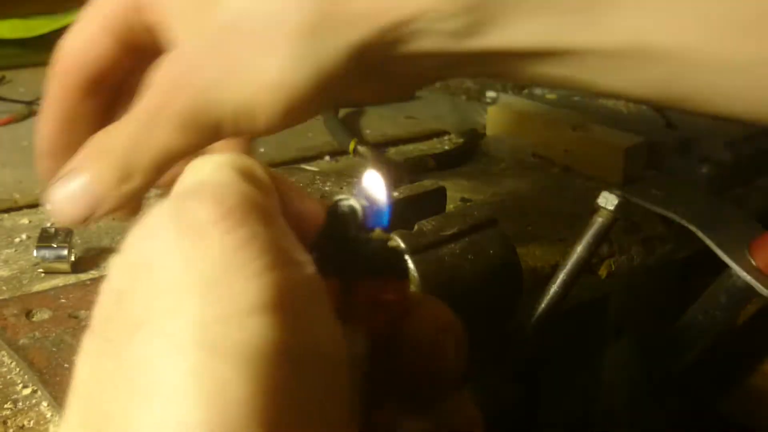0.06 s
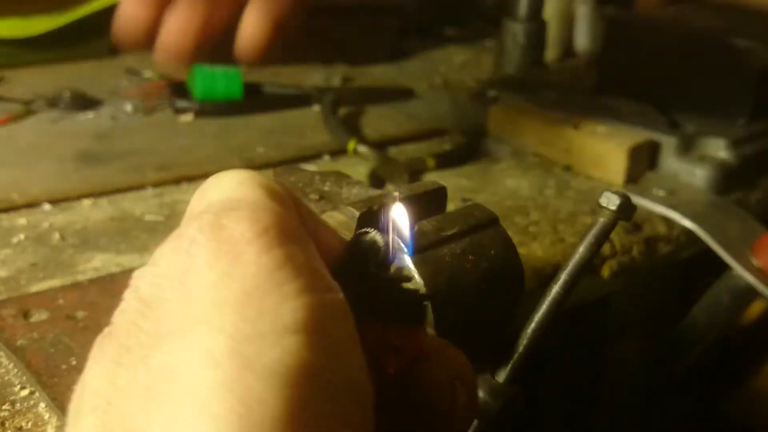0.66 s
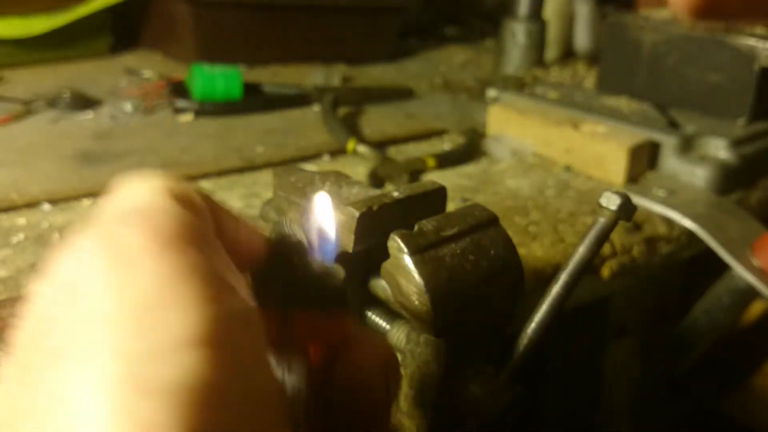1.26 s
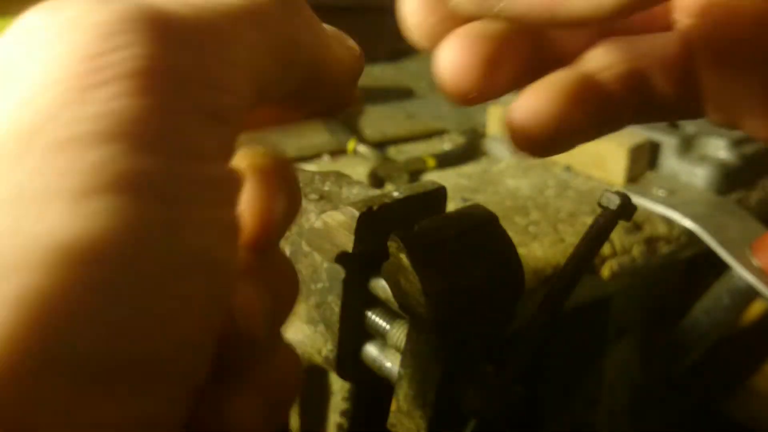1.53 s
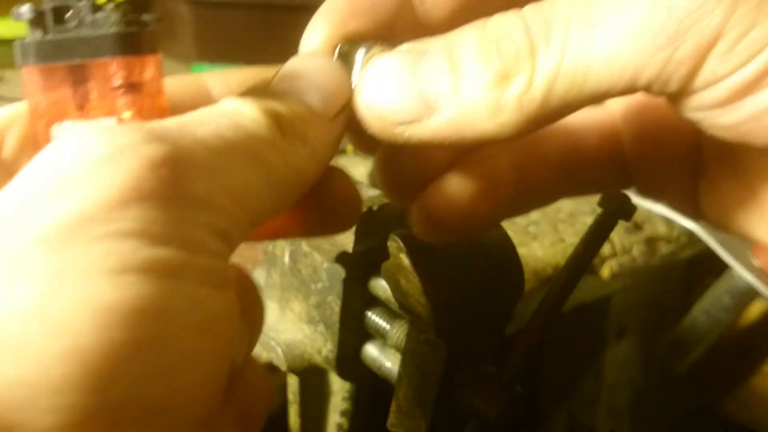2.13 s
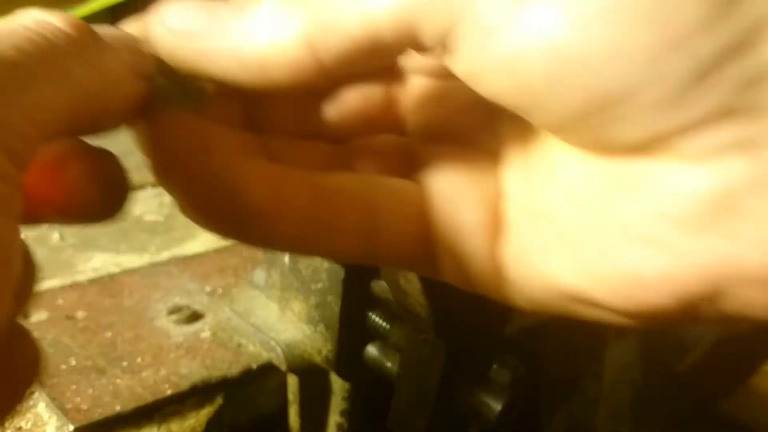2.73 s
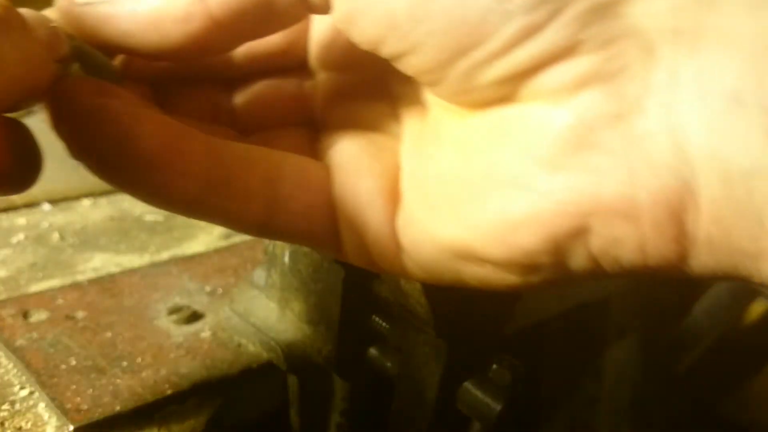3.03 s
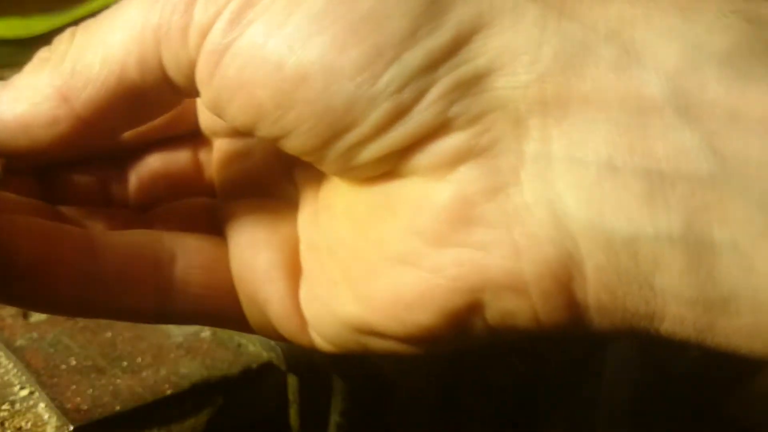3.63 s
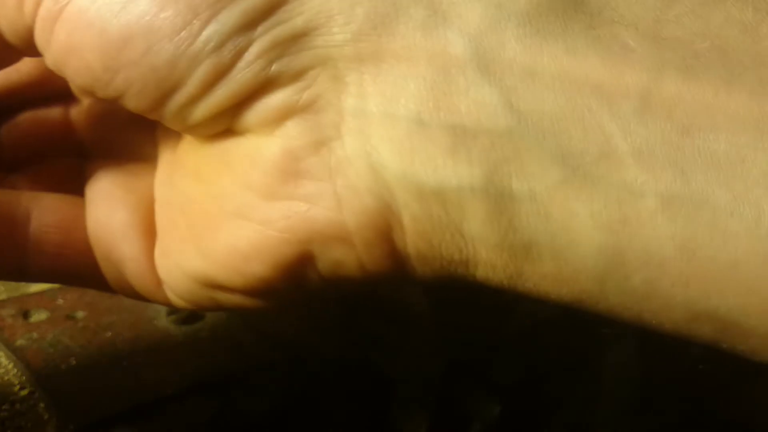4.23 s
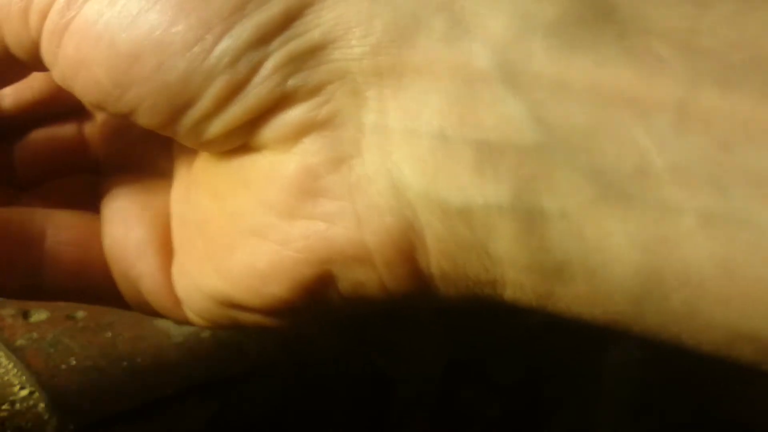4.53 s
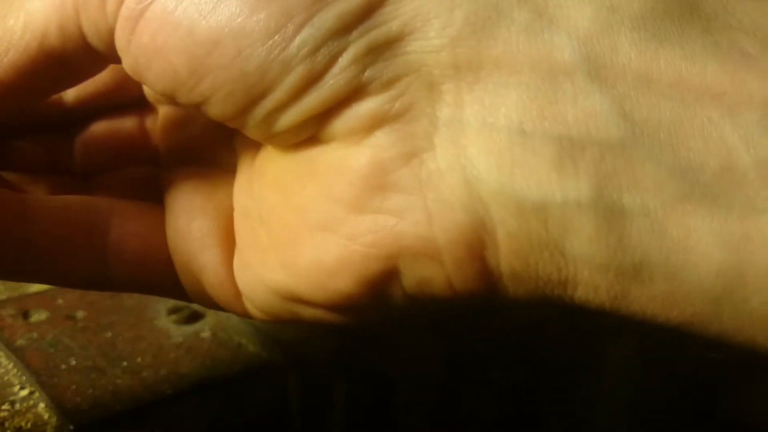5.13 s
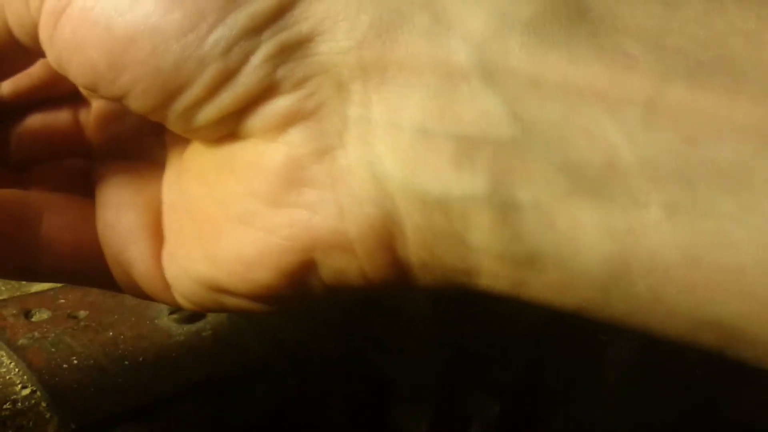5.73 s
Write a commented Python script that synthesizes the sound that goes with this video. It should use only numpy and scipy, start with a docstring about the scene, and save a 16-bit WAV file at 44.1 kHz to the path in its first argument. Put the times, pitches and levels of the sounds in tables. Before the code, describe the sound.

A disposable lighter is handled close to the microphone in a small, dry workshop, over faint steady hiss and a low mains hum on the right. A few light finger ticks lead to one short, bright, gritty rasp of the flint wheel at about 0.6 seconds. Between 1.1 and 1.8 seconds there is a barely audible whistle and hiss of gas, with scattered small ticks of fingers on the lighter. At about 2.6 seconds a thumb pushes the steel hood down in a quick cluster of soft, muffled thuds. At 2.8 seconds the hood snaps home, the loudest sound: a sharp, briefly ringing metal click with a dull plastic knock and a slight low thump. After that only the background remains, until a camera's focus motor ticks faintly in three short runs from about 5.4 to 5.8 seconds.

```python
"""A lighter on a workbench

A disposable lighter is handled close to the microphone in a small, dry workshop. The flint wheel
rasps once, the gas sings faintly, fingers tick on the case, then the steel hood is pressed on and
snaps home. Underneath are hiss, mains hum on the right and a camera's faintly stepping focus."""
import sys
import numpy as np
from scipy import signal
from scipy.fft import rfft, irfft
from scipy.io import wavfile

SR = 44100
rng = np.random.default_rng(int(sys.argv[2]) if len(sys.argv) > 2 else 0)


def generate_wav(sig):
    """Save sig (samples, or channels by samples) to the path in sys.argv[1] as 16-bit PCM at SR."""
    pcm = np.round(np.clip(np.atleast_2d(sig).T, -1, 1) * 32767).astype(np.int16)
    wavfile.write(sys.argv[1], SR, pcm)


N = 259308
TAPS = 2 ** 14  # samples allowed for a ring or an echo to die away
TIME, FREQS = np.arange(N) / SR, np.maximum(np.fft.rfftfreq(TAPS, 1 / SR), 1)


# The wheel creeps, turns under growing pressure, then spins free: start_s, level_db, slope_db_per_s
WHEEL_SLIDES = [(0.548, -51, -0.5), (0.5558, -40, 279.5), (.582, -21.5, -1050)]
# Tone of the scraped flint: pitch_hz, gain_db
FLINT_TONE = [(100, -22), (250, -16.5), (700, -15), (1200, -13.5), (1700, -14), (3000, -6), (5500, 0.5),
              (7500, -2), (10000, -2.5), (12500, -14), (15500, -17)]
# Where the wheel and its bracket ring: pitch_hz, width_hz, boost_db
WHEEL_RINGS = [(1630, 200, 6.5), (2700, 460, 5.5), (3660, 190, 8.5), (5060, 110, 2.5), (5620, 190, 9),
               (5900, 110, 3.5), (7410, 130, 7.5), (9240, 150, 1.5)]

def flint_wheel(teeth_hz=440, bite=.4):
    """The wheel's teeth tear grains off the flint; each slide swells or fades until the next begins."""
    force = np.zeros(N)
    for start_s, level_db, slope in WHEEL_SLIDES:
        start = round(start_s * SR)
        force[start:] = amp(np.clip(level_db + slope * TIME[:N - start], -200, 0))
    teeth = 1 + bite * np.sin(2 * np.pi * teeth_hz * TIME)
    return body(force * teeth * grit(grains_per_s=11000), FLINT_TONE, WHEEL_RINGS)


# The hood passes its catches and snaps home: start_s, level_db, decay_s
HOOD_SNAPS = [(2.7911, -62.5, 0.0075), (2.8182, -21.5, .0012), (2.8205, -13.5, .003)]
# Tone of the steel hood: pitch_hz, gain_db
HOOD_TONE = [(200, -17.5), (900, -14.5), (1400, -20), (2000, -8.5), (3500, -9), (5500, -0.5), (7500, -2),
             (10000, -4.5), (12500, -20.5), (15500, -23.5)]
# Where the hood rings: pitch_hz, width_hz, boost_db
HOOD_RINGS = [(2740, 80, 9.5), (3800, 82, 9), (3962, 110, 10), (4670, 70, -1), (5220, 110, 8),
              (5300, 80, 4.5), (6200, 99.4, 6.5), (6180, 100, 3), (6300, 60, 3), (8090, 110, -1.5),
              (9440, 70, 5), (9610, 70, 1)]

def steel_hood(rattle_db=-17.5, rattle_decay_s=.01976):
    """The hood rings brightly at each catch, then rattles on more quietly."""
    rattles = [(start_s, level_db + rattle_db, rattle_decay_s) for start_s, level_db, _ in HOOD_SNAPS]
    return body(contacts(HOOD_SNAPS, blow_share=.06) + contacts(rattles), HOOD_TONE, HOOD_RINGS)


# The thumb pushes the hood down in jerks: start_s, level_db, decay_s
THUMB_PUSHES = [(2.6285, -46.5, .003), (2.632, -39.5, .004), (2.641, -44, .009), (2.662, -49, .006),
                (2.712, -66.5, .014)]
# Tone of hood and case under the thumb: pitch_hz, gain_db
MUFFLED_TONE = [(50, -27.5), (130, -11), (330, -1.5), (550, -1), (750, -7.5), (1050, -5.5), (1600, -10.5),
                (2800, -9), (3900, -14), (5000, -31), (15500, -55)]
# Where they still ring: pitch_hz, width_hz, boost_db
MUFFLED_RINGS = [(449.7, 110, 12), (2680, 180, 7.7)]

def thumb_pushes():
    """The thumb muffles the hood as it presses, so each push is a thud."""
    return body(contacts(THUMB_PUSHES, blow_share=.5), MUFFLED_TONE, MUFFLED_RINGS)


# The boom after the snap: start_s, level_db, decay_s
LOW_BOOM = [(2.836, -40, .02)]
# Tone of the boom: pitch_hz, gain_db
BOOM_TONE = [(30, -14.5), (60, -12), (100, -19.5), (150, -3), (220, -0.5), (340, -9.5), (600, -19.5),
             (1500, -45), (15500, -70)]

def low_boom():
    """A low, soft boom lingers just after the snap."""
    return body(contacts(LOW_BOOM), BOOM_TONE)


# Knocks of the case: start_s, level_db, decay_s
CASE_KNOCKS = [(.406, -64, 0.012), (.586, -55, .008), (2.788, -60.5, 0.014), (2.8228, -21.5, .005)]
# Tone of the plastic: pitch_hz, gain_db
CASE_TONE = [(20, -44), (60, -27), (120, -14.5), (250, -7.5), (500, -0.5), (750, -5.5), (1100, -5.5),
             (1600, -10), (2700, -5.5), (3800, -12), (5000, -27), (9000, -44), (15500, -53)]
# Where the case and cupped hand ring: pitch_hz, width_hz, boost_db
CASE_RINGS = [(139, 9.3, 9), (200.7, 13, 11), (253, 28, 10.5), (340, 25, 5.5), (457, 43, 11.5),
              (534.6, 35, 5.5), (661, 23, 13), (900, 80, 6)]

def plastic_case():
    """The plastic case knocks dully in the cupped hand."""
    return body(contacts(CASE_KNOCKS, blow_share=.6), CASE_TONE, CASE_RINGS)


# Light ticks of lever, wheel and fingernails: start_s, level_db, decay_s, sharp_share (0 to 1)
FINGER_TICKS = [(0.199, -66.5, 0.0042, 0), (0.226, -71, .005, 0), (0.409, -68, .002, .02),
                (0.44, -47.5, 0.0021, 0.87), (.5345, -54, 0.0012, 0), (0.635, -59.5, .002, .7),
                (1.3944, -63.5, 0.0039, 0.17), (1.501, -68.5, .005, .1), (1.604, -73.5, .005, 0.3),
                (1.652, -56.5, 0.0028, 0.65), (1.779, -63.5, .0009, 0.5), (1.8277, -69.5, .0015, 0.5),
                (2.612, -64.5, .0015, 0.17), (2.659, -60.5, .006, 0), (2.711, -68.5, .02, 0),
                (5.7953, -64.5, .0012, .1)]
# Tones of a soft tick and a sharp tick: pitch_hz, gain_db
SOFT_TONE = [(200, -19.5), (1500, -5), (2800, 1), (3900, 0.5), (4700, -8.5), (5700, -7.5), (8000, -21.5),
             (15500, -32)]
SHARP_TONE = [(200, -25), (1800, -7), (2800, -4), (4000, -3.5), (5700, 4.5), (8000, -2.5), (11000, -0.5),
              (15500, -19.5)]
# Where the lever and hood rims ring: pitch_hz, width_hz, boost_db
LEVER_RINGS = [(2830, 220, 3), (3640, 250, 7.5)]
# A brief, faint hiss fades away at the start; later rows are skin rubs: peak_s, level_db, half_length_s
RUSTLES = [(0, -77.5, 0.027), (.21, -85.5, 0.032), (.47, -76, 0.019), (1.455, -79, 0.044),
           (1.68, -84.5, 0.073), (2.78, -81.5, 0.086), (3.1, -95, .3)]
# Tone of the rustles: pitch_hz, gain_db
RUSTLE_TONE = [(500, -11), (3500, -0.5), (5700, -1.5), (8000, -10), (15500, -19)]

def fingers():
    """Fingers make small ticks, each part soft and part sharp, among faint rustles."""
    start_s, level_db, decay_s, sharp_share = np.transpose(FINGER_TICKS)
    sharp_share = np.clip(sharp_share, .0001, .9999)
    soft = contacts(zip(start_s, level_db + 10 * np.log10(1 - sharp_share), decay_s), blow_share=.2)
    sharp = contacts(zip(start_s, level_db + 10 * np.log10(sharp_share), decay_s), blow_share=.2)
    rustle = swells(RUSTLES, TIME) * grit(grains_per_s=2500)
    return body(soft, SOFT_TONE, LEVER_RINGS) + body(sharp, SHARP_TONE) + body(rustle, RUSTLE_TONE)


# Puffs of gas: peak_s, level_db, half_length_s, whistle_share (0 to 1)
GAS_PUFFS = [(1.123, -79.5, 0.031, 0.95), (1.47, -78, 0.15, 0.1), (1.756, -88, 0.032, 0.2)]

def gas():
    """Gas swirls out of the nozzle, part thin whistle and part narrow hiss."""
    whistle, hiss = narrow_noise(pitch_hz=2075, width_hz=46), narrow_noise(pitch_hz=2185, width_hz=450)
    sound = np.zeros(N)
    for *puff, whistle_share in GAS_PUFFS:
        blend = np.sqrt(whistle_share) * whistle + np.sqrt(1 - whistle_share) * hiss
        sound += swells([puff], TIME) * blend
    return sound


def hands(sound, count=12, width_hz=470):
    """High notes linger briefly in gaps between palms and vice, differently for left and right."""
    gaps_hz = np.geomspace(2500, 14000, count) * np.exp(rng.uniform(-.08, .08, (2, count)))
    radius = np.exp(-np.pi * width_hz / SR)
    tunings = -2 * radius * np.cos(2 * np.pi * gaps_hz / SR)
    # All-pass filters hold some pitches back without making them louder or quieter.
    filters = [[[radius ** 2, tune, 1, 1, tune, radius ** 2] for tune in side] for side in tunings]
    return np.array([signal.sosfilt(gaps, side) for gaps, side in zip(filters, sound)])


# Strength of the echoes next to the direct sound: pitch_hz, gain_db
ECHO_LEVEL = [(150, -5), (500, -2.5), (2000, -2.5), (5500, -6.5), (12000, -12.5)]
# Time the early echoes take to fade by 60 dB: pitch_hz, fade_s
ECHO_FADE = [(150, 0.17), (500, 0.13), (2500, 0.12), (6000, 0.069), (12000, .12)]
# How alike the echoes are on the left and right: pitch_hz, likeness (0 to 1)
ECHO_LIKENESS = [(300, 1), (700, 1), (1400, .2), (3000, 0.032)]
# Strength of the late tail next to the early echoes: pitch_hz, gain_db
TAIL_LEVEL = [(300, -23.5), (2500, -24.5), (6000, -39.5), (12000, -53.5)]

def workshop(sound, onset_s=.003, tail_fade_s=.3):
    """Echoes from bench and walls die quickly, band by band, over a faint late tail."""
    t, room = TIME[:TAPS], np.zeros((2, TAPS))
    bands_hz = np.geomspace(60, 16000, 25)
    fade_in = 1 - np.exp(-(t / onset_s) ** 2)
    for hz in bands_hz:
        band = np.sqrt(np.interp(np.log(FREQS), np.log(bands_hz), bands_hz == hz))
        middle, side = irfft(rfft(rng.standard_normal((2, TAPS))) * band)
        alike = at_hz(ECHO_LIKENESS, hz)
        noise = np.sqrt(1 + alike) * middle + np.sqrt(1 - alike) * side * [[1], [-1]]
        early = amp(-60 * t / at_hz(ECHO_FADE, hz))
        late = amp(at_hz(TAIL_LEVEL, hz) - 60 * t / tail_fade_s)
        echoes = noise * (early + late) * fade_in
        echoes /= np.linalg.norm(echoes, axis=1, keepdims=True)
        room += echoes * np.sqrt(np.mean(band ** 2)) * amp(at_hz(ECHO_LEVEL, hz))
    return convolve(sound, room)


# The hands sit to one side of the two microphones: pitch_hz, left_minus_right_db
SIDE_BALANCE = [(300, 0), (700, 5), (1300, -2), (2500, -7), (4000, -5.5), (5500, -11), (7500, 0),
                (10000, -3.5), (12500, -11), (15500, -9.5)]

def microphones(sound, right_lag_s=.00018):
    """Sound reaches the left microphone first and the echoes follow; each side has its own tone."""
    direct = np.array([sound[0], np.interp(TIME - right_lag_s, TIME, sound[0])])
    arriving = hands(direct) + workshop(sound)
    lean_db = at_hz(SIDE_BALANCE, FREQS) / 2
    return convolve(arriving, [tap_response(amp(lean_db)), tap_response(amp(-lean_db))])


# The lens hunts for focus in short runs: peak_s, level_db, half_length_s
LENS_RUNS = [(.9, -75, .5), (5.36, -72.5, .07), (5.617, -63, .04), (5.812, -64, .04)]
# Tone of the lens housing: pitch_hz, gain_db
LENS_TONE = [(200, -29), (700, 8), (1500, -6), (3900, -2.5), (5000, -21.5), (15500, -36.5)]
# Where the housing rings: pitch_hz, width_hz, boost_db
LENS_RINGS = [(680, 170, 15), (3630, 350, 4)]

def focus_motor(first_step_s=.03, step_gap_s=.03345, decay_s=.007):
    """The lens moves in small, evenly timed steps that tick through the camera's housing."""
    times = np.arange(first_step_s, TIME[-1], step_gap_s)
    levels_db = 20 * np.log10(swells(LENS_RUNS, times))
    steps = [(start_s, level_db, decay_s) for start_s, level_db in zip(times, levels_db)]
    return body(np.array([contacts(steps), contacts(steps)]), LENS_TONE, LENS_RINGS)


# Tones of the steady hiss and the low rumble: pitch_hz, gain_db
HISS_TONE = [(80, -0.5), (170, -6.5), (350, -1.5), (550, -1.5), (900, -4.5), (1500, -9), (2300, -10),
             (3300, -11.5), (4000, -15.5), (4800, -20), (8000, -22.5), (15500, -27)]
RUMBLE_TONE = [(8, -1.5), (20, -8.5), (40, -16.5), (90, -22.5), (300, -60.5), (1000, -85.5)]
# Notes of the mains hum: pitch_hz, level_db
MAINS_HUM = [(49.8, -63), (348, -85), (249, -92.5)]

def background(hiss_db=-75.5, lean_left_db=1.0, rumble_db=-81):
    """Each side has its own hiss and rumble; the mains hums only on the right."""
    hiss = amp(hiss_db) * body(rng.standard_normal((2, N)), HISS_TONE)
    rumble = amp(rumble_db) * body(rng.standard_normal((2, N)), RUMBLE_TONE)
    hum = sum(np.sqrt(2) * amp(db) * np.sin(2 * np.pi * hz * TIME) for hz, db in MAINS_HUM)
    return hiss * amp([[lean_left_db], [-lean_left_db]]) + rumble + hum * np.array([[0], [1]])


def contacts(rows, blow_share=0):
    """Each touch is a fading burst of tiny slips; a share of its energy comes as one clean blow."""
    power, blows = np.zeros(N), np.zeros(N)
    for start_s, level_db, decay_s in rows:
        start = round(start_s * SR)
        burst = amp(level_db) ** 2 * np.exp(-2 * TIME[:min(TAPS, N - start)] / decay_s)
        power[start:start + len(burst)] += burst
        blows[start] += np.sqrt(burst.sum())
    slips = np.sqrt((1 - blow_share) * power) * rng.choice([-1, 1], N)
    return np.sqrt(blow_share) * blows + slips


def grit(grains_per_s):
    """Rubbing makes tiny cracks of uneven size at random moments."""
    sizes = amp(4 * np.minimum(rng.exponential(1, N), 3))
    grains = (rng.random(N) < grains_per_s / SR) * rng.choice([-1, 1], N) * sizes
    return grains / grains.std()


def narrow_noise(pitch_hz, width_hz):
    """Swirling gas rings around one pitch; the narrower the band, the more it whistles."""
    edges_hz = [pitch_hz - width_hz / 2, pitch_hz + width_hz / 2]
    band = signal.butter(2, edges_hz, "band", fs=SR, output="sos")
    noise = signal.sosfilt(band, rng.standard_normal(N))
    return noise / noise.std()


def swells(rows, t):
    """The level rises and falls in a bell curve around each peak."""
    power = sum(amp(db) ** 2 * np.exp(-((t - peak_s) / half_s) ** 2) for peak_s, db, half_s in rows)
    return np.sqrt(power + 1e-18)


def body(force, tone, rings=()):
    """An object gives a force its broad tone and ringing pitches; the force sets the level."""
    peaks = sum((amp(db) ** 2 - 1) / (1 + (2 * (FREQS - hz) / width) ** 2) for hz, width, db in rings)
    response = tap_response(amp(at_hz(tone, FREQS)) * np.sqrt(np.maximum(1 + peaks, .1)))
    return convolve(force, response / np.linalg.norm(response))


def tap_response(gain):
    """The sound of one tap with this tone; nothing sounds before the tap (minimum phase)."""
    cepstrum = irfft(np.log(gain))
    cepstrum[1:TAPS // 2] *= 2
    cepstrum[TAPS // 2 + 1:] = 0
    return irfft(np.exp(rfft(cepstrum)))


def convolve(sound, response):
    """Let every sample of a sound set off the same ring or echo, channel by channel."""
    return signal.oaconvolve(np.atleast_2d(sound), np.atleast_2d(response), axes=1)[:, :N]


def at_hz(table, hz):
    """Read between a table's rows at any pitch, with octaves evenly spaced."""
    pitches_hz, values = np.transpose(table)
    return np.interp(np.log(hz), np.log(pitches_hz), values)


def amp(db):
    """Turn decibels into a multiplier."""
    return 10 ** (np.asarray(db) / 20)


def scene():
    """The lighter in the room, over the focus motor and the steady background."""
    lighter = flint_wheel() + steel_hood() + thumb_pushes() + low_boom() + plastic_case()
    return microphones(lighter + fingers() + gas()) + focus_motor() + background()


def record(dry, cutoff_hz=15900):
    """The highest treble is cut off steeply."""
    return signal.sosfilt(signal.ellip(10, .2, 70, cutoff_hz, fs=SR, output="sos"), dry)


dry = scene()
out = record(dry)
generate_wav(out)
```